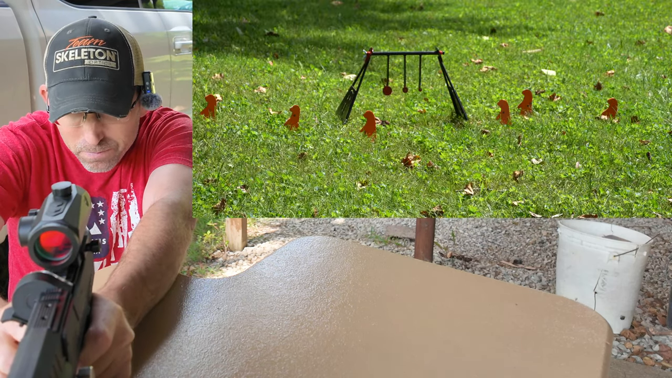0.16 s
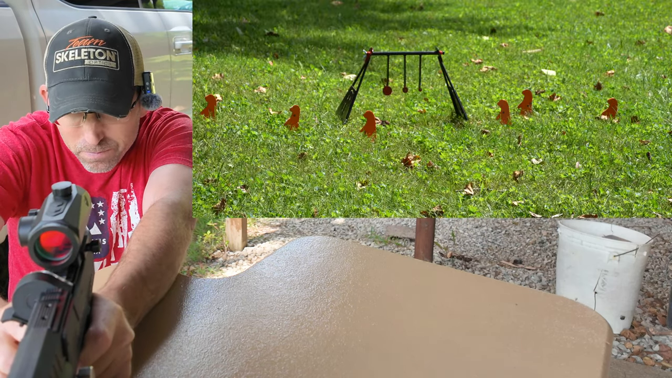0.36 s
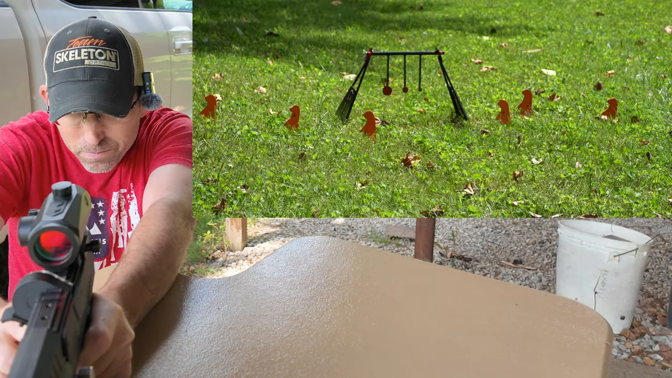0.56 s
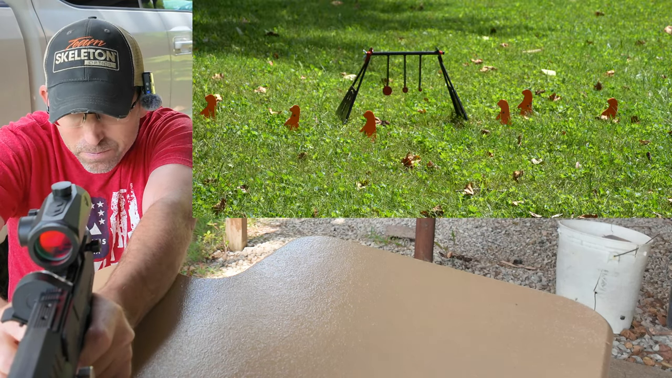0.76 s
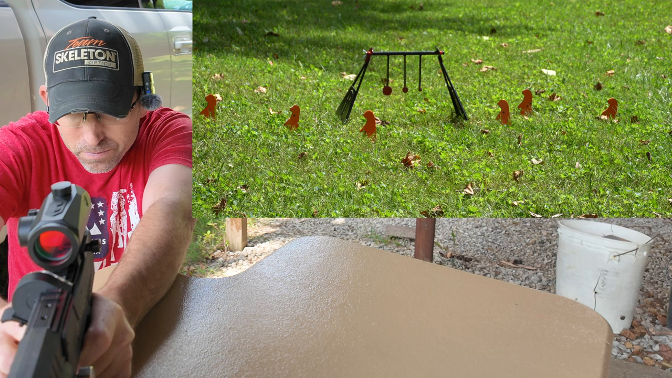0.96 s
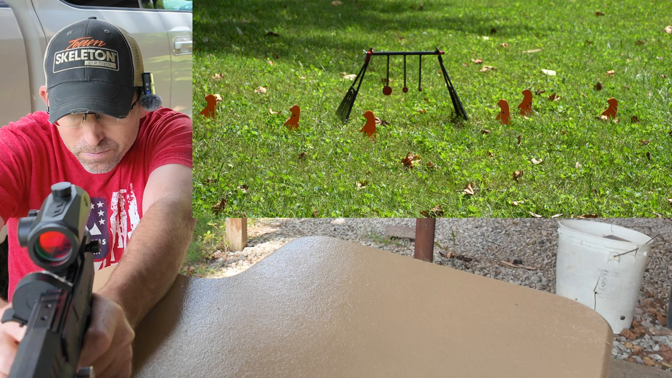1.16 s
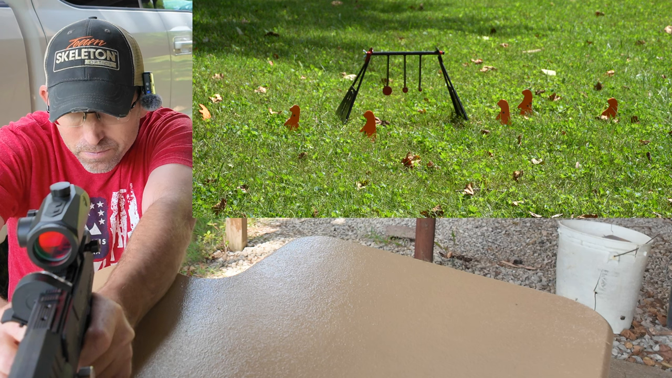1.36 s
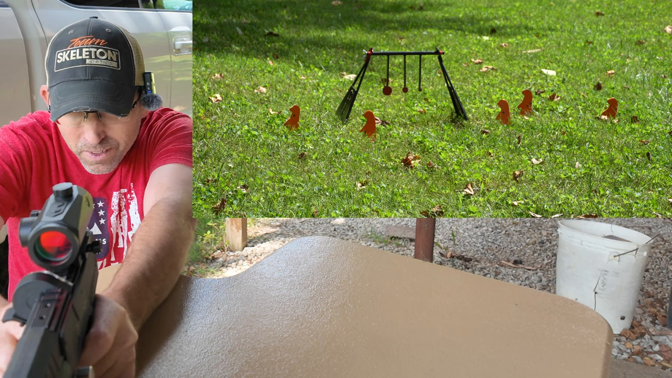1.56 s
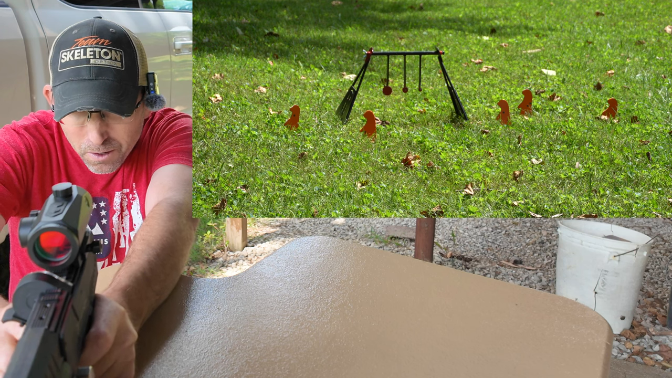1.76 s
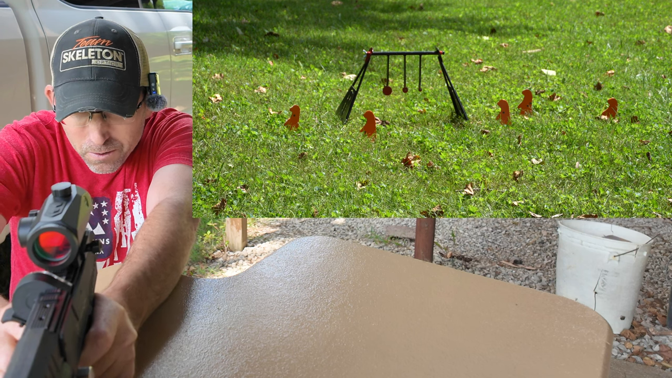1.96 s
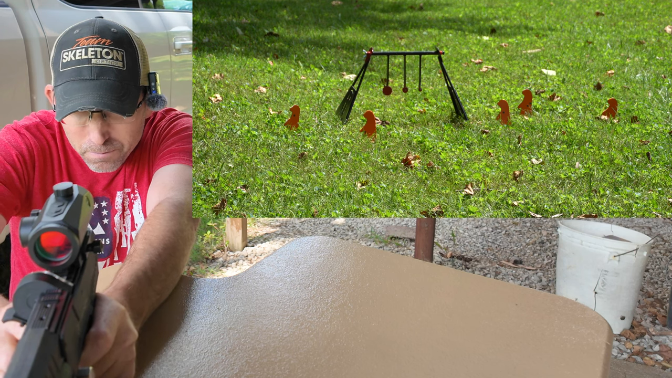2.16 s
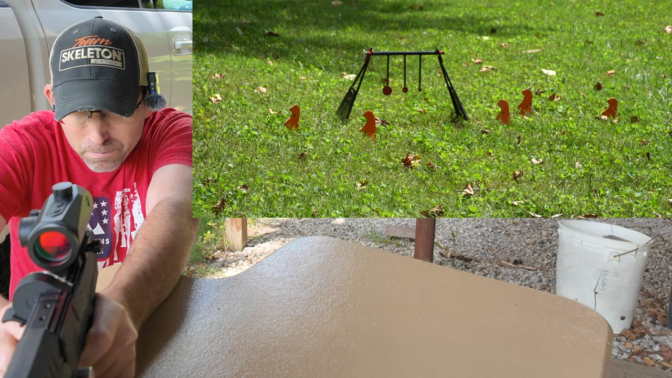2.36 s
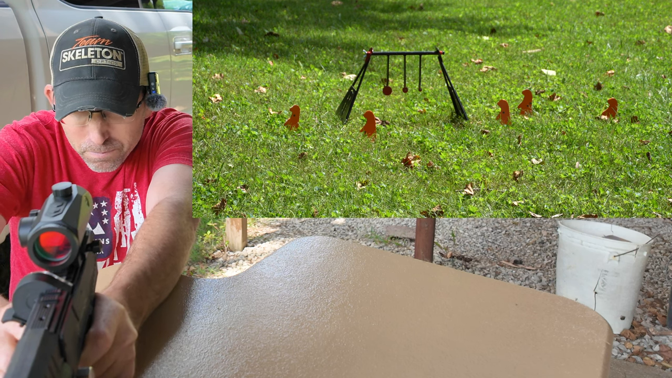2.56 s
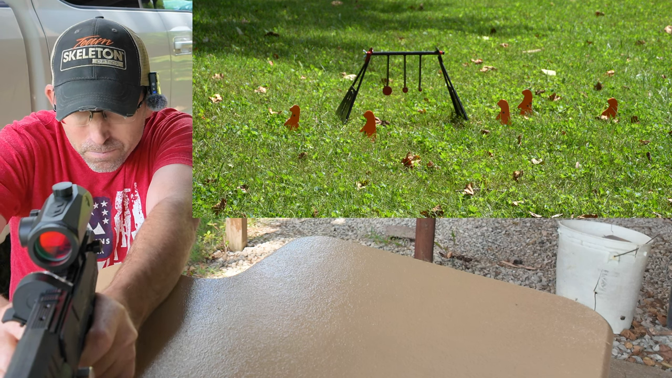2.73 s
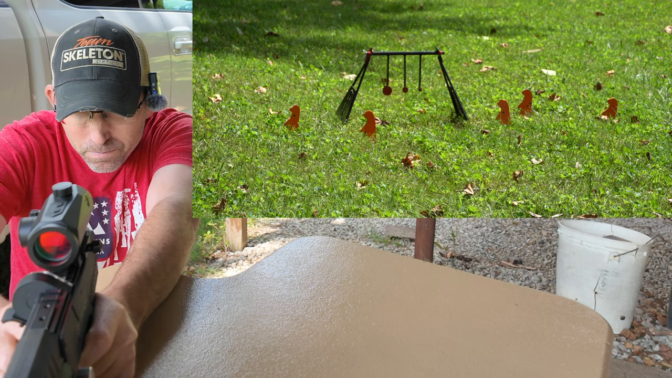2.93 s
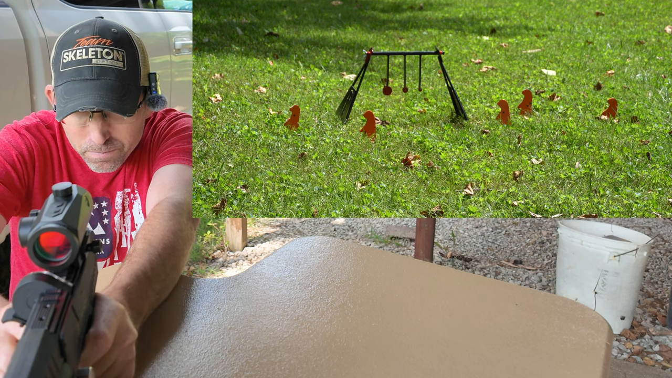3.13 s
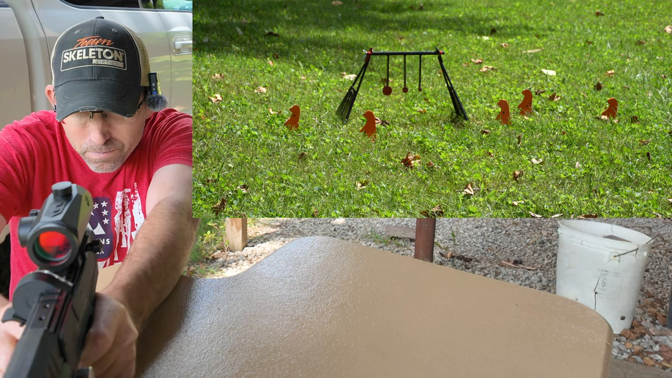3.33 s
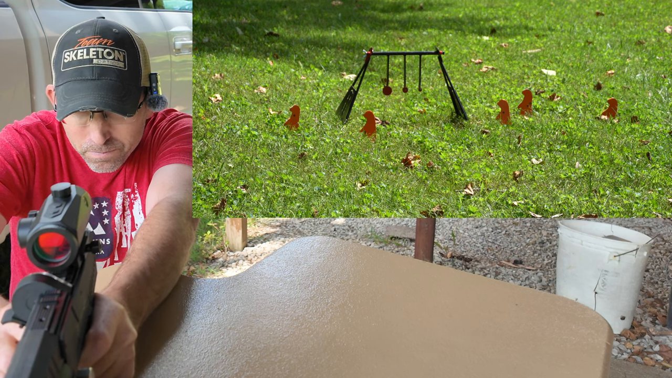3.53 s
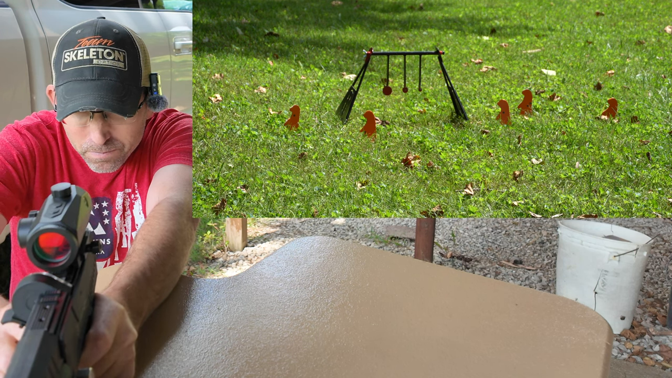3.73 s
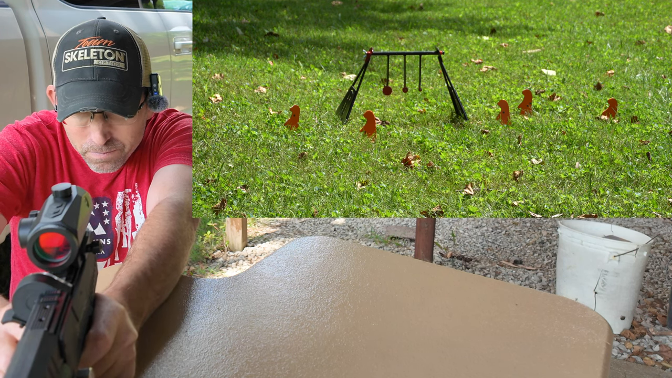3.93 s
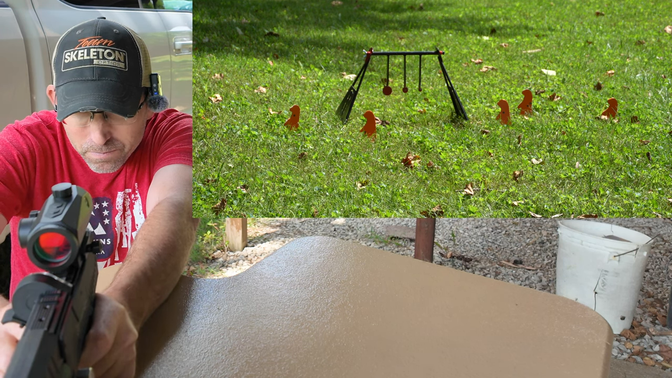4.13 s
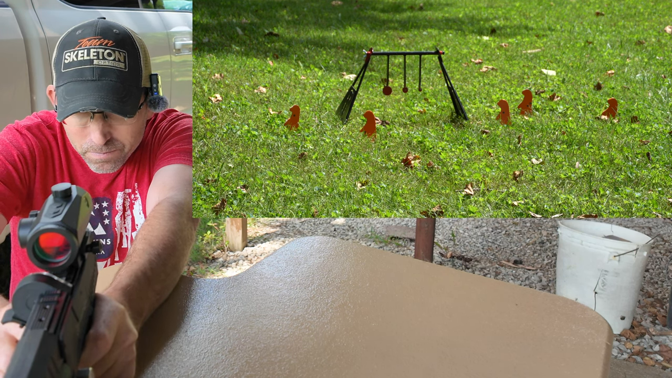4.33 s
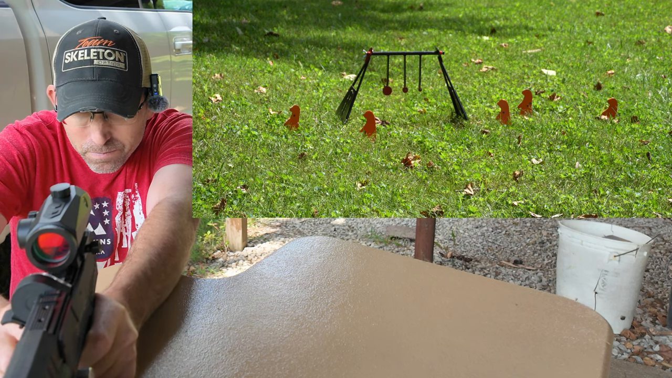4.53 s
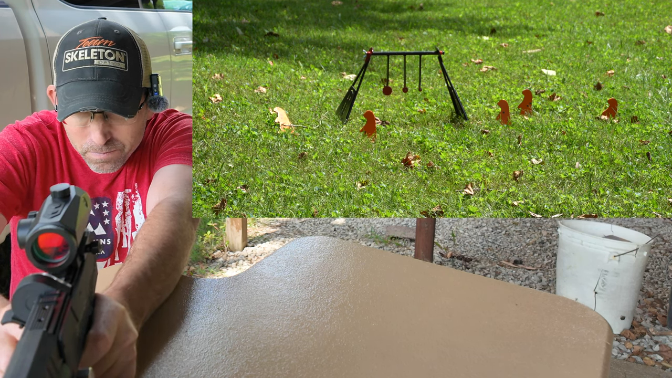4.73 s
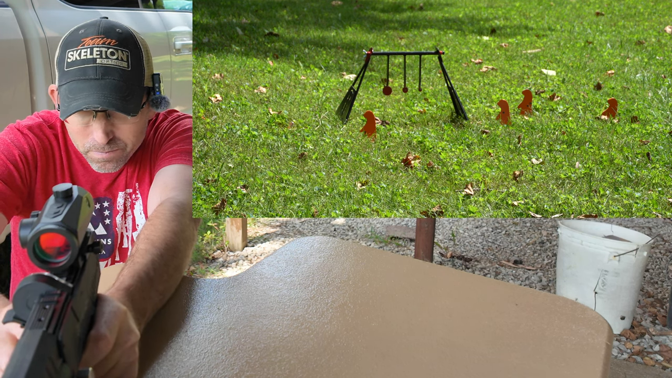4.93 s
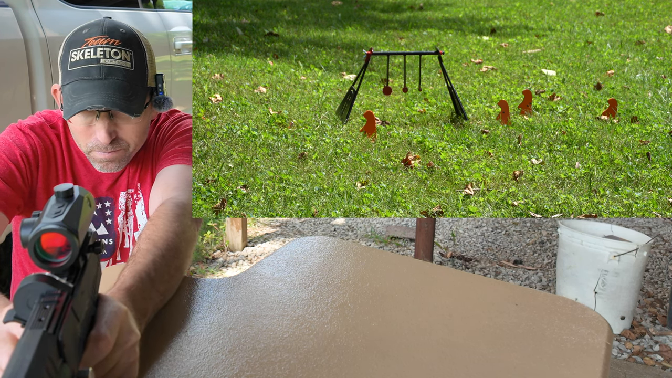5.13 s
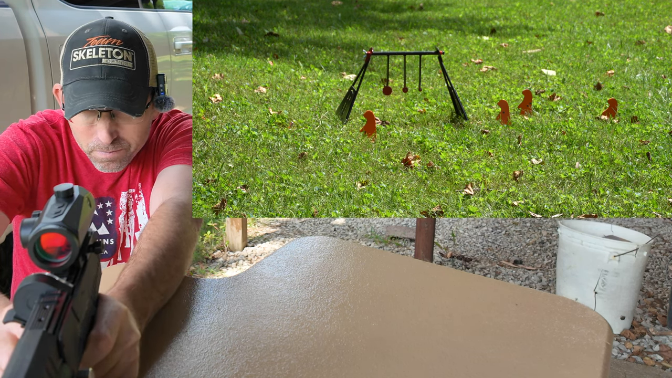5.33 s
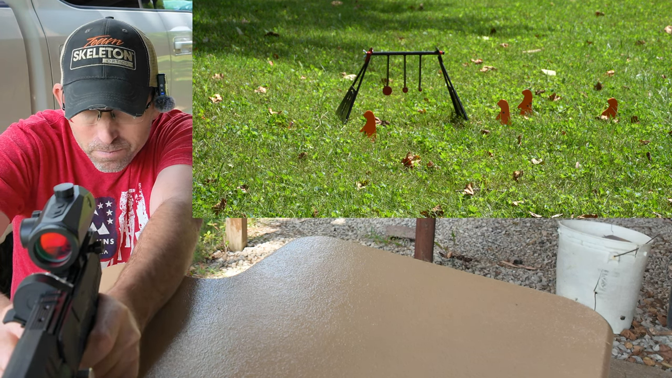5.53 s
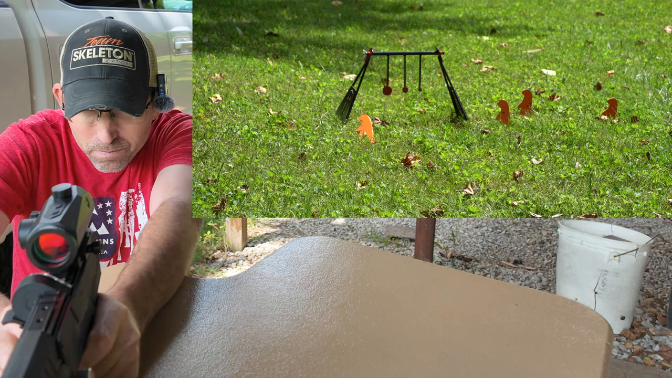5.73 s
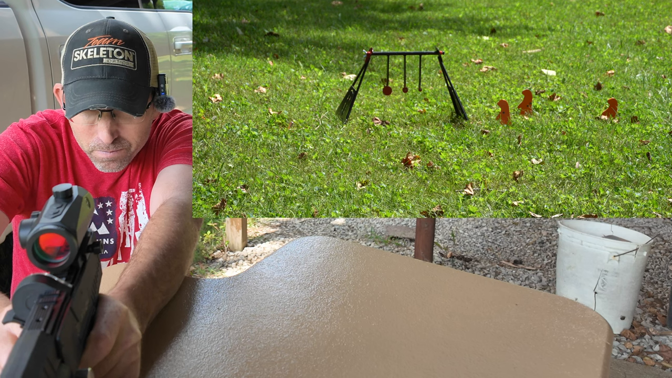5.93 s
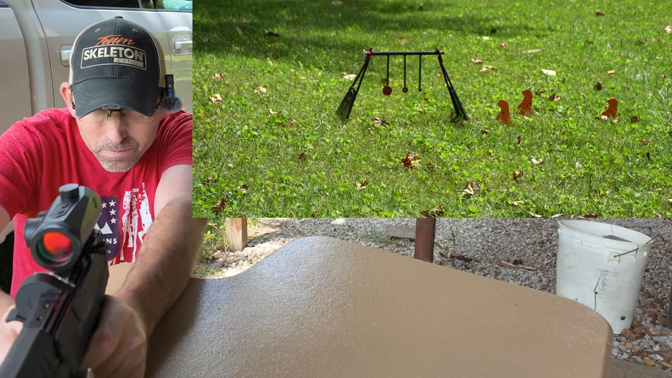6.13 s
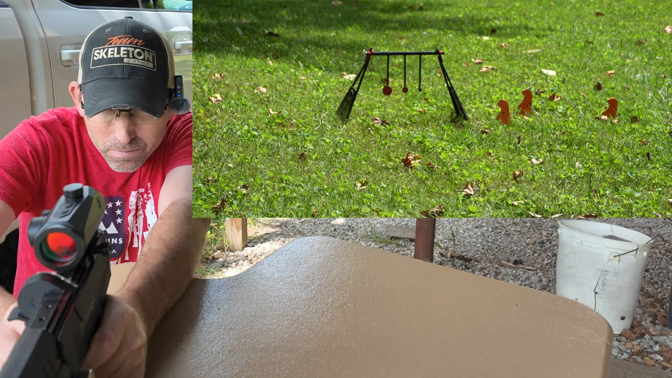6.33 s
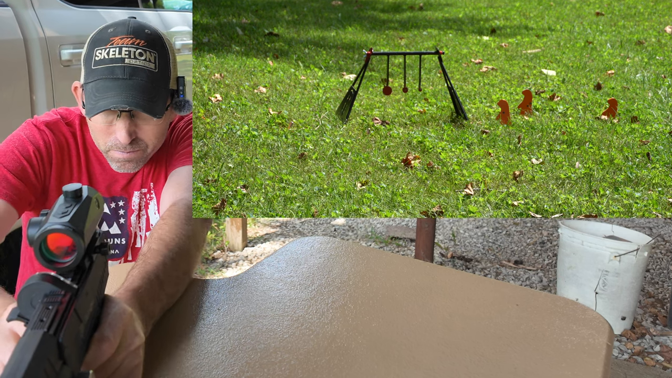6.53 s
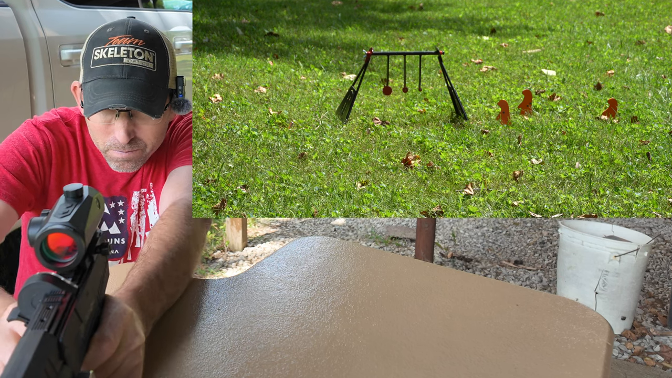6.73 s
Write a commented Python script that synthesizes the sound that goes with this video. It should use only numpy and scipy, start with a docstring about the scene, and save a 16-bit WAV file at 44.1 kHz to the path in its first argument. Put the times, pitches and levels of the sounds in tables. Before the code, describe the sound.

Quiet outdoor yard with insects, a soft far wash and a faint distant engine; a cricket trills briefly at first. A close air pistol then fires four hard, snappy shots with metallic action clatter, short boom and echo. The first, third and fourth are answered by bright steel pings that flutter as the targets tumble. Small trigger clicks follow.

```python
"""Insects, a far wash and a distant small engine sound throughout: shaped noise and firing harmonics in a
pipe. A cricket trills at the start: a gated sine. From 1.2 s a gas-driven air pistol fires four times from
a bench under a shelter, close by: pressure pulses, echo noise, a resonant boom and metal knocks.
The first, third and fourth pellets topple small steel targets, whose plate modes ring as they tumble.
Trigger clicks follow the shots; soft thuds come in between, and one short hiss of filtered noise."""
import sys
import numpy as np
from scipy import signal
from scipy.io import wavfile
from scipy.ndimage import uniform_filter1d

SR = 44100
rng = np.random.default_rng(int(sys.argv[2]) if len(sys.argv) > 2 else 0)


def bounce(signal):
    """Save signal as a 16-bit WAV file at the path given by the first command-line argument."""
    frames = np.transpose(np.atleast_2d(signal))
    limited = np.clip(frames, -1, 1)
    pcm = np.round(limited * 32767).astype(np.int16)
    wavfile.write(sys.argv[1], SR, pcm)


N = 303408  # length [samples]

# Left-right likeness of the echoes: (frequency [Hz], likeness [0 to 1])
ECHO_LIKENESS = [(60, 1.0), (130, 1.0), (290, 1.0), (640, 0.93), (1410, 0.88), (3100, 0.77), (6820, 0.19),
                 (15000, 0.32)]
# Left-right likeness of the far sounds: (frequency [Hz], likeness [0 to 1])
FAR_LIKENESS = [(60, 0.35), (130, 1.0), (290, 0.98), (640, 0.99), (1410, 0.99), (3100, 1.0), (6820, 0.55),
                (15000, 0.31)]


def amp(db):
    """Level law: decibels to a pressure ratio."""
    return 10 ** (np.asarray(db) / 20)


def evened(x):
    """Power normalization: scales to rms 1."""
    return x / np.sqrt(np.mean(x ** 2) + 1e-20)


def read(points, hz):
    """Interpolates a spectrum on a logarithmic frequency axis, as pitch is heard."""
    f, value = np.transpose(points)
    return np.interp(np.log(hz + 1), np.log(f + 1), value)


def add(mix, s, sound):
    """Superposition: adds a sound into the mix from time s [s]."""
    part = mix[..., round(s * SR):][..., :sound.shape[-1]]
    part += sound[..., :part.shape[-1]]


def sides(pan_db):
    """Level-difference stereo: left and right gains for left over right [dB]."""
    return amp([[pan_db / 2], [-pan_db / 2]])


def ring(x, hz, width_hz):
    """Damped resonance: a pole pair whose radius sets the bandwidth."""
    r = np.exp(-np.pi * width_hz / SR)
    return signal.lfilter([1, 0, -r], [1, -2 * r * np.cos(2 * np.pi * hz / SR), r * r], x)


def noise(field_db, likeness, count, size, patchy_db):
    """Spectral synthesis: random stereo noise with level field_db(Hz, s) and likeness tying left to right."""
    hz = np.fft.rfftfreq(size, 1 / SR)
    frames = 4 * count // size + 6
    a, b, c, d, patches = rng.standard_normal((frames, len(hz), 5)).T
    # patches of level spread over 3 frequency bins and 40 frames
    patches = uniform_filter1d(patches, size=3, axis=0)
    patches = evened(uniform_filter1d(patches, size=40, axis=1))
    like = np.clip(read(likeness, hz), -1, 1)[:, None]
    left, other = a + 1j * b, c + 1j * d
    spectrum = np.array([left, like * left + np.sqrt(1 - like ** 2) * other])
    frame_s = np.arange(frames) * size / 4 / SR
    spectrum *= amp(field_db(hz[:, None], frame_s) + patchy_db * patches)
    return signal.istft(spectrum, nperseg=size, noverlap=3 * size // 4)[1][:, :count]


def air():
    """Broadband ambience: insect bands are humps in log frequency over a smooth far wash."""
    # Spectrum of the far wash: (frequency [Hz], relative level per Hz [dB])
    wash_spectrum = [(15, -31), (25, -6), (135, -7), (313, -11.5), (496, -13), (4990, -23.5), (6200, -19),
                     (7100, -26.5), (15200, -45), (16500, -42)]
    # Steady insect bands: (centre [Hz], relative width in log frequency, level over the wash [dB])
    insect_bands = [(2380, 0.098, 3.5), (3200, 0.052, 4), (5683, 0.12, 4)]
    # Swells: (time [s], boost of the insect band near 6 kHz [dB], boost of the wash around 3.6 kHz [dB])
    swells = [(0, 8.5, -2), (.5, 3.5, -1.5), (1.1, 1, 3.5), (2.7, 3, -1), (3.3, 3, 6.5), (4.2, 0.33, 5.5),
              (5.2, 4, -2.54), (6.2, 0.1, 2.5), (6.88, 4.5, -2.1)]
    swell_s, chorus_db, wash_db = np.transpose(swells)

    def hump(hz, centre_hz, width):
        return np.exp(-(np.log((hz + 1) / centre_hz) / width) ** 2)

    def field(hz, t):
        level_db = read(wash_spectrum, hz)
        level_db = level_db + sum(db * hump(hz, f, width) for f, width, db in insect_bands)
        level_db = level_db + np.interp(t, swell_s, chorus_db) * hump(hz, 6000, 0.2)
        return level_db + np.interp(t, swell_s, wash_db) * hump(hz, 3600, 0.91)

    ambience = noise(field, FAR_LIKENESS, count=N, size=1024, patchy_db=0.33)
    return amp(-64.5) * evened(ambience) * sides(.5)


def engine():
    """Source and filter: firing harmonics swell as they pass the pipe resonances, over exhaust roar."""
    # The engine revs up, sags once and winds down: (time [s], firing rate [Hz])
    firing = [(0, 62), (.33, 74.5), (.9, 89), (1.3, 91), (1.8, 97), (2.4, 99.3), (2.8, 98.5), (3.0, 92),
              (3.6, 93), (3.9, 98), (4.3, 88), (4.6, 84), (5.2, 73), (6.88, 70)]
    # Exhaust pipe response to the harmonics: (frequency [Hz], gain [dB])
    pipe = [(60, -3.5), (100, -1.5), (185, -9), (300, -21), (390, -11), (440, -8.5), (490, -2),
            (560, -17.5), (690, -4), (800, -12.5), (900, -10), (1000, -12), (1090, -8.5), (1200, -23)]
    # Exhaust roar: (frequency [Hz], relative level per Hz [dB])
    roar_spectrum = [(40, -42.5), (100, -16.5), (200, -15.5), (270, -25.5), (490, -12.5), (700, -9),
                     (1170, -17.5), (4500, -30), (6000, -60.5)]
    full_db, full_hz, db_per_hz = -62.5, 89, 0.42  # roar level at working speed; loss per Hz below it
    t = np.arange(N) / SR
    hz = np.interp(t, *np.transpose(firing))
    unsteady = evened(uniform_filter1d(rng.standard_normal(N), 1500))
    cycles = np.cumsum(hz * (1 + 0.0029 * unsteady)) / SR
    tone = sum(amp(read(pipe, k * hz)) * np.cos(2 * np.pi * (k * cycles + rng.random()))
               for k in range(1, 14))
    roar = noise(lambda f, s: read(roar_spectrum, f), FAR_LIKENESS, count=N, size=2048, patchy_db=2.05)[0]
    speed_db = full_db - db_per_hz * np.maximum(full_hz - hz, 0)
    return amp(speed_db) * (amp(-0.5) * evened(tone) + evened(roar))


def cricket():
    """Stridulation: wing strokes gate a tone near 7.8 kHz that sags late in each, faint echo between."""
    start_db, swell_db, end_s = -62, 2, .89  # the trill swells, then stops
    t = np.arange(0, end_s, 1 / SR)
    strokes = 26.35 * t + .27  # strokes per second, and the share of one already past
    u = strokes % 1
    size_db = 1.0 * rng.standard_normal(40)[strokes.astype(int)]  # scatter between strokes
    hz = 7760 + 90 * t - 1400 * np.clip(u - .38, 0, .3) * (u < .7)
    shape = np.exp(-((u - .36) / .17) ** 2) + .16
    level_db = start_db + swell_db * (t / end_s) ** 2 + size_db
    out = np.zeros((2, N))
    add(out, 0, amp(level_db) * shape * np.sin(2 * np.pi * np.cumsum(hz) / SR) * sides(-12))
    return out


def knock(db, hz, ms):
    """Impact excitation: metal parts chatter for the knock, then the frame rings out; harder is brighter."""
    t = np.arange(3000) / SR
    grit = rng.standard_normal((2, len(t)))
    grit[1] = grit[0] + 0.15 * grit[1]  # nearly the same left and right
    parts = evened(ring(ring(grit, hz, width_hz=3400), hz, width_hz=3400))
    broad = evened(ring(grit, 3500, width_hz=6100))
    metal = evened(parts + amp(-6.0 + .6 * (db + 15)) * broad)
    u = 1000 * t / ms
    fade = np.exp(-u ** 3 * 1.6) + 0.16 * np.exp(-t / 0.026)
    return amp(db) * metal * np.minimum(u / 0.027, 1) * fade


def echoes():
    """Outdoor reverberation: walls, trees and lawn return the blast, each band dying at its own speed."""
    # Echo spectrum: (frequency [Hz], relative level per Hz [dB])
    echo_spectrum = [(35, -49), (60, -23), (290, -1.5), (1130, -12.5), (1270, -17), (1500, -11),
                     (1650, -14), (3930, -9.5), (4860, -13), (5460, -8.5), (6590, -11), (9160, -10.5),
                     (11600, -17.5), (15000, -16), (16500, -43.5)]
    # Decay of the echo: (frequency [Hz], t60 [s])
    echo_t60 = [(100, 0.4), (260, 0.37), (700, 0.58), (1840, 0.61), (4850, 0.53), (9000, .4), (15000, 0.24)]
    # Bands where the echo hangs on: (centre [Hz], width [Hz], extra t60 [s])
    lingers = [(2505, 220, .1), (4450, 300, .08), (5350, 200, 0.055)]
    # Far walls and trees: (delay [s], spread [s], level over the tail [dB])
    slaps = [(.095, .012, 1.5), (0.124, 0.0023, 4), (.155, .004, 5.5)]
    rise_ms = 6

    def field(hz, s):
        t60 = read(echo_t60, hz)
        t60 = t60 + sum(extra * np.exp(-((hz - f) / width_hz) ** 2) for f, width_hz, extra in lingers)
        return read(echo_spectrum, hz) - 60 * s / t60

    tail = noise(field, ECHO_LIKENESS, count=SR, size=512, patchy_db=1.2)
    tail = tail / np.sqrt(np.mean(tail[:, :4000] ** 2))
    t = np.arange(SR) / SR
    slaps_db = sum(db * np.exp(-((t - delay) / spread) ** 2) for delay, spread, db in slaps)
    rise = 1 - np.exp(-(1000 * t / rise_ms) ** 2)
    return amp(slaps_db) * tail * rise


def blast():
    """Impulsive gas release: a pressure jump, then suction; a small muzzle radiates no deep bass."""
    u = 1000 * np.arange(800) / SR / 0.44  # time in units of 0.44 ms
    pulse = (1 - u) * np.exp(-u) * (1 - np.exp(-u * 6))
    push = signal.lfilter(*signal.butter(1, 70, 'high', fs=SR), pulse)
    edge = signal.lfilter(*signal.butter(1, 500, 'high', fs=SR), push)
    # the muzzle is right of centre; bass has no side
    return (push + np.array([[-.25], [.25]]) * edge) / push.max()


def shelter():
    """Modal resonance: the boom of roof and bench, many close panel modes blurring each peak."""
    # Boom peaks: (frequency [Hz], relative level [dB], t60 [s])
    boom_peaks = [(129.3, -23, 1.7), (195.2, -11, .9), (289.4, -5.5, 0.44), (352.5, -9, 0.69),
                  (380, -10.5, 0.25), (435, -5.5, 0.15), (440, -7.5, 0.064), (700, -14, .18),
                  (902, -14, 0.26), (1045, -11.5, .26)]
    blur = .065  # width of each peak, share of its pitch
    t = np.arange(SR) / SR
    boom = 0
    for hz, db, t60 in boom_peaks:
        # the first second lets the resonance settle
        steady = evened(ring(rng.standard_normal(2 * SR), hz, width_hz=blur * hz)[SR:])
        boom = boom + amp(db - 60 * t / t60) * steady
    return boom[None] * (1 - np.exp(-t / 0.0018))


def pistol():
    """Superposed direct sound, bench reflection, echoes, shelter boom and the knocks of the action."""
    # Shots: (blast time [s], blast level [dB], echo [dB], boom of the shelter [dB], hammer [dB],
    # valve [dB], slide [dB])
    shots = [(1.2054, -5.5, -26.5, -26.5, -19.5, -16.5, -17.5), (3.3893, -8.5, -23, -24, -31, -19, -15),
             (4.5410, -5, -26.5, -26.5, -26.5, -20, -16), (5.6445, -5.5, -25.5, -27, -22.5, -16, -17)]
    # Slide thrown back (two knocks), then home (two knocks):
    # (time after the blast [ms], level over the slide level [dB], ring [Hz], length [ms])
    slide_knocks = [(7.2, -2.5, 3000, 7), (8.7, 1.2, 4080, 3), (15.3, -5.5, 7000, 4.7),
                    (17.4, -2.5, 3800, 1.3)]
    out = np.zeros((2, N))
    for s, db, echo_db, boom_db, hammer_db, valve_db, slide_db in shots:
        push = blast()
        add(out, s, amp(db) * push)
        add(out, s + 0.001733, amp(db - 5) * push)  # bounce off the bench
        add(out, s, amp(echo_db) * echoes())
        add(out, s, amp(boom_db) * shelter())
        # hammer, then valve, just before the blast (offsets in ms)
        add(out, s + -3.5 / 1000, knock(hammer_db, hz=3750, ms=4.6))
        add(out, s + -1.091 / 1000, knock(valve_db, hz=3800, ms=2.7))
        for after_ms, over_db, hz, ms in slide_knocks:
            add(out, s + after_ms / 1000, knock(slide_db + over_db, hz, ms))
    return out


def wobble(count):
    """Low-pass random modulation: slow chance of rms 1, about 30 changes a second."""
    slow = uniform_filter1d(rng.standard_normal(count), size=900)
    return evened(uniform_filter1d(slow, size=900))


def plate(t, pitches, modes, spun, grass_db):
    """Modal directivity: damped plate modes, each beaming its own way as the target turns."""
    top_db, out = max(mode[0] for mode in modes), 0
    for hz, (db, t60, loss_db) in zip(pitches, modes):
        weak = top_db - db  # dB under the loudest mode
        aim, pan = rng.standard_normal(2)
        # weaker modes beam more narrowly: more scatter in aim [turns], more swing and flutter
        swing = np.cos(2 * np.pi * (spun + 0.0081 * weak * aim)) + .4 * wobble(SR)
        swing_db = (2 + 0.1685 * weak) * swing
        level_db = db - 60 * t / t60 - np.minimum(grass_db, loss_db) + swing_db
        out = out + amp(level_db) * np.sin(2 * np.pi * hz * t) * sides(2.9 * pan)
    return out


def splatter():
    """Diffuse scattering: pellet fragments and the crack return as a bright, quickly dying wash."""
    rise_ms = 18

    def field(hz, s):
        decay_db = -60 * s / (.45 - 0.22 * hz / 16000)
        return decay_db - 14 * abs(np.log((hz + 1) / 6000)) ** 1.9

    wash = noise(field, ECHO_LIKENESS, count=SR, size=256, patchy_db=3.1)
    rise = 1 - np.exp(-np.arange(SR) * 1000 / SR / rise_ms)
    return wash / wash[:, :2000].std() * rise


def targets():
    """Impact and modal decay: a crack, then plate modes swinging with the tumble, damped on landing."""
    # Pellet strikes: time [s]
    strike_times = [1.2717, 4.60805, 5.71165]
    # For each strike: (crack [Hz], left over right [dB], tumble at first [turns/s],
    # facing at the strike [turns], lands after [s], echo [dB], splatter [dB])
    strikes = [(6500, 3.5, 26, 0.61, 0.024, -14, -21), (6540, 3.5, 18.3, 0.44, .19, -28, -25.5),
               (7050, 4.5, 18.6, 0.71, 0.12, -18, -17.5)]
    # Mode frequencies of each target [Hz]
    mode_hz = [
        [2805, 5962, 6690, 8934, 9717, 11549, 13069, 13622, 14460],
        [2870, 4833, 6028, 6390, 6978, 8920, 9725, 12043, 13110, 14460],
        [2810, 3515, 5284, 6431, 7510, 9208, 12060, 13257, 13580, 14893],
    ]
    # For each mode of each target: (level [dB], t60 [s], limit of the loss to the grass [dB])
    mode_decays = [
        [(-41.5, 0.36, 4), (-26.5, 0.44, 2), (-21.5, .26, 11), (-29, .18, 5), (-24, .3, 2), (-11.5, 0.29, 16),
         (-28, 0.27, 2.5), (-28.5, 0.33, 7.5), (-34, .22, 5)],
        [(-34.5, .4, -1), (-34, 0.54, 9), (-36.5, 0.64, 11), (-35, .25, 0), (-9, .76, 24), (-16.5, .27, 4),
         (-28, .33, 4), (-17.5, 0.17, 24), (-34, .3, 12), (-28, .15, 19)],
        [(-36, 0.41, 3), (-38, 0.39, -5), (-25, 0.34, 13), (-23, 0.22, 8), (-14.5, 0.71, 18), (-17.5, 0.46, 5),
         (-33, 0.149, 19), (-22, 0.32, 16), (-30, .33, 10), (-30, 0.2, 12)],
    ]
    grass_db_per_s = 256  # extra damping once a target lies in the grass
    crack_ms = .075  # width of the crack
    out, t = np.zeros((2, N)), np.arange(SR) / SR

    def yard_field(f, age):
        # air swallows the treble first
        return -60 * age / (1.3 - 1.06 * np.minimum(f / 13000, 1.2))

    for s, strike, pitches, modes in zip(strike_times, strikes, mode_hz, mode_decays):
        hz, pan_db, turns, facing, lands, echo_db, splatter_db = strike
        spun = facing + turns * (t - 0.27 * t ** 2)  # the tumble slows down
        steel = plate(t, pitches, modes, spun, grass_db_per_s * np.maximum(t - lands, 0))
        steel = steel * np.minimum(1000 * t / (3 * crack_ms), 1) ** 2  # the ring grows out of the crack
        u = t[:200] - 2 * crack_ms / 1000
        crack = amp(4) * np.cos(2 * np.pi * hz * u) * np.exp(-(1000 * u / crack_ms) ** 2)
        # the yard answers with scattered reflections
        yard = noise(yard_field, ECHO_LIKENESS, count=SR, size=256, patchy_db=-0.5) * (t > .004)
        yard = yard / np.linalg.norm(yard[0])
        add(out, s, amp(echo_db) * signal.fftconvolve(steel, yard, axes=1))
        add(out, s, (steel + amp(splatter_db) * splatter()) * sides(pan_db))
        add(out, s, crack * sides(pan_db))
    return out


def trigger():
    """Impact-excited small modes: the released trigger clicks back, ringing its parts."""
    # Trigger resets: (time [s], level [dB], length [ms])
    resets = [(1.5056, -22.5, 3.3), (3.6639, -23.5, 3.4), (4.7499, -21, 2.85), (5.81, -34, 7.5)]
    # Trigger parts: (frequency [Hz], relative level [dB])
    part_modes = [(1300, -14.5), (1820, -19), (2435, -8), (3005, -2), (3752, 1), (4320, -3.5), (4800, -8.5),
                  (5700, -11), (6757, -5), (8550, -13), (9600, -18)]
    out, t = np.zeros((2, N)), np.arange(4000) / SR
    for s, db, ms in resets:
        parts = sum(amp(level_db) * np.sin(2 * np.pi * (hz * t + rng.random()))
                    for hz, level_db in part_modes)
        grit = ring(rng.standard_normal((2, len(t))), 5200, width_hz=3600)
        grit = evened(ring(grit, 6400, width_hz=2800))
        u = 1000 * t / ms
        rise = np.minimum(u / 0.12, 1)
        add(out, s, amp(db) * rise * (evened(parts) + 0.41 * grit) * np.exp(-u ** 3 * 1.04))
        add(out, s, amp(db - 24.5) * rise * grit * np.exp(-t / 0.021))  # nearby reflections
    return out


def thuds():
    """Heavily damped resonance: short dull rings of filtered noise nearby."""
    # Soft thuds and ticks: (time [s], level [dB], frequency [Hz], t60 [s])
    soft_hits = [(1.596, -42.5, 700, 0.023), (1.603, -50, 816, 0.026), (1.615, -41.5, 410, 0.093),
                 (2.449, -54.5, 1070, 0.027), (5.1942, -55, 1170, 0.036), (6.531, -62, 45.5, 0.18)]
    out, t = np.zeros(N), np.arange(SR // 4) / SR
    for s, db, hz, t60 in soft_hits:
        grit = rng.standard_normal(len(t))
        dull = evened(ring(ring(grit, hz, 0.46 * hz), hz, 0.46 * hz))
        add(out, s, amp(db - 60 * t / t60) * dull)
    return out


def hiss():
    """Band-passed noise: bright bursts with a sudden start and an exponential decay."""
    # The two steps: (time [s], level [dB], centre [Hz], width [Hz], t60 [s], left over right [dB])
    steps = [(2.82, -60.5, 6600, 6000, 0.17, 12), (2.839, -49, 4600, 3740, 0.26, -1.5)]
    out, t = np.zeros((2, N)), np.arange(SR // 2) / SR
    for s, db, hz, width_hz, t60, pan_db in steps:
        grit = rng.standard_normal((2, len(t)))
        grit[1] = 0.82 * grit[0] + 0.17 * grit[1]
        burst = evened(ring(ring(grit, hz, width_hz), hz, width_hz))
        level_db = db - 60 * np.maximum(t - .02, 0) / t60  # holds briefly, then decays
        add(out, s, burst * np.minimum(t / 0.0031, 1) * amp(level_db) * sides(pan_db))
    return out


def scene():
    """Linear superposition of all sources at the microphone pair."""
    return air() + engine() + cricket() + pistol() + targets() + trigger() + thuds() + hiss()


def record(dry):
    """Band-limited transduction: deep bass drops, peaks clip at full scale, a low-pass ends the band."""
    thin = signal.lfilter(*signal.butter(2, 45, 'high', fs=SR), dry)
    limit = signal.firwin(511, 16600, window=("kaiser", 9), fs=SR)[None]
    return signal.oaconvolve(np.clip(thin, -1, 1), limit, "same")


dry = scene()
out = record(dry)
bounce(out)
```